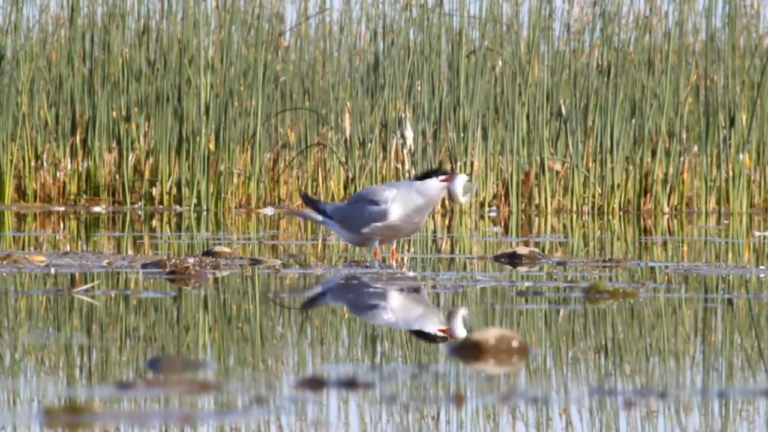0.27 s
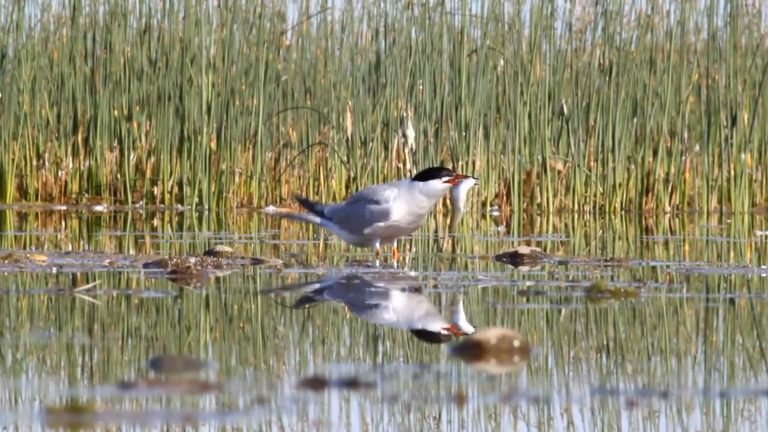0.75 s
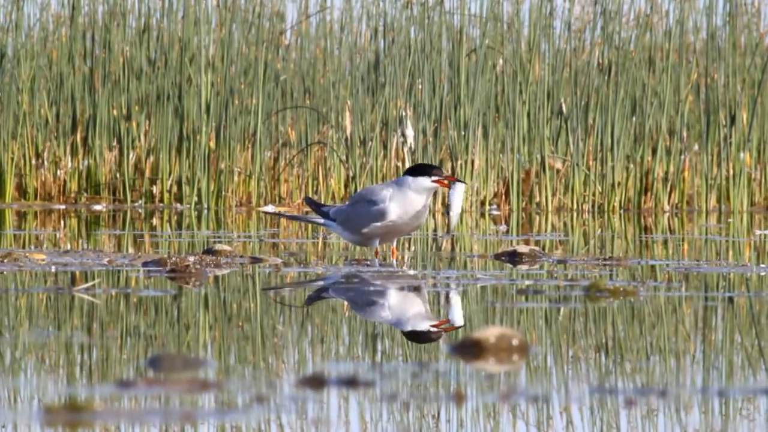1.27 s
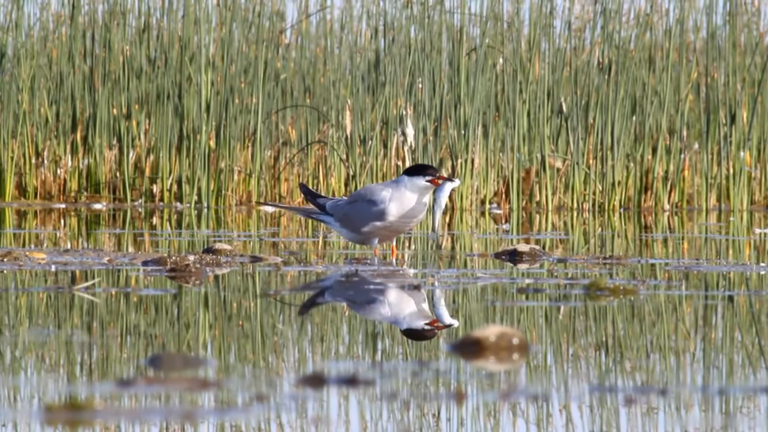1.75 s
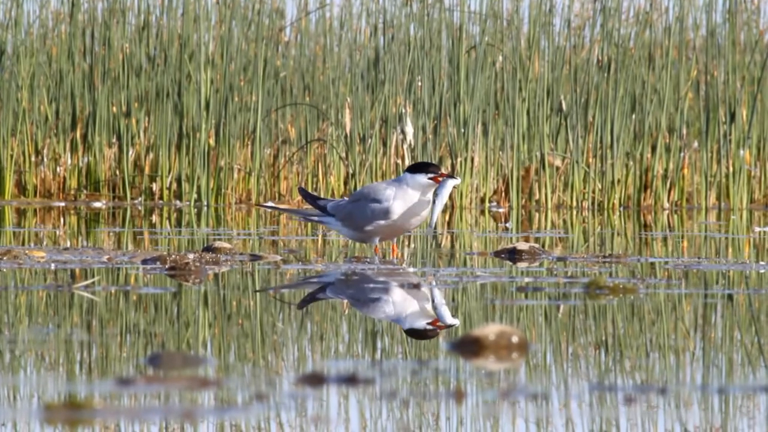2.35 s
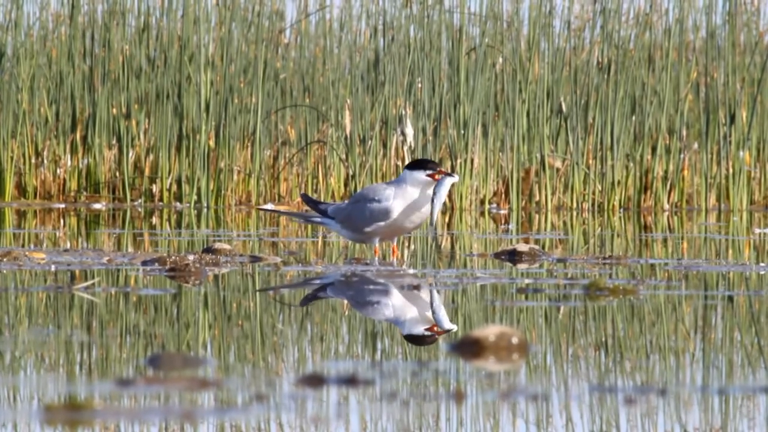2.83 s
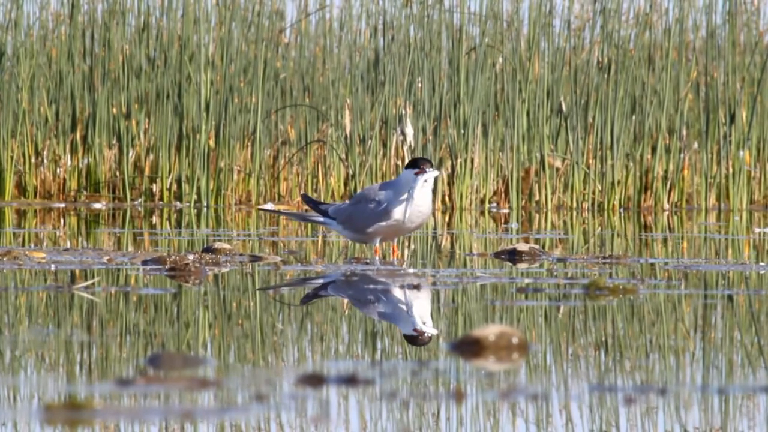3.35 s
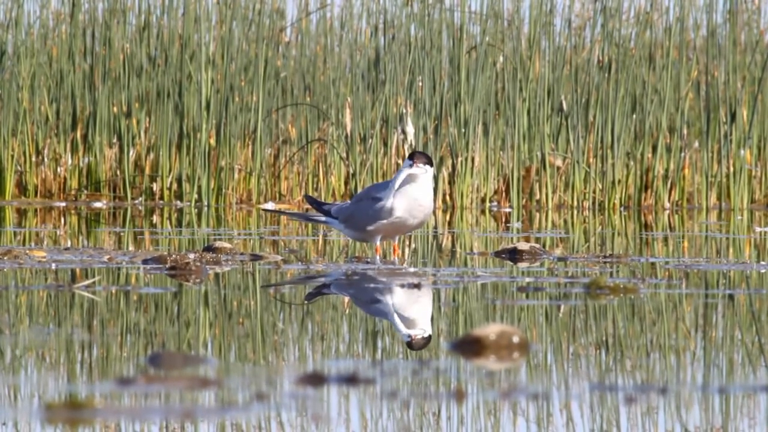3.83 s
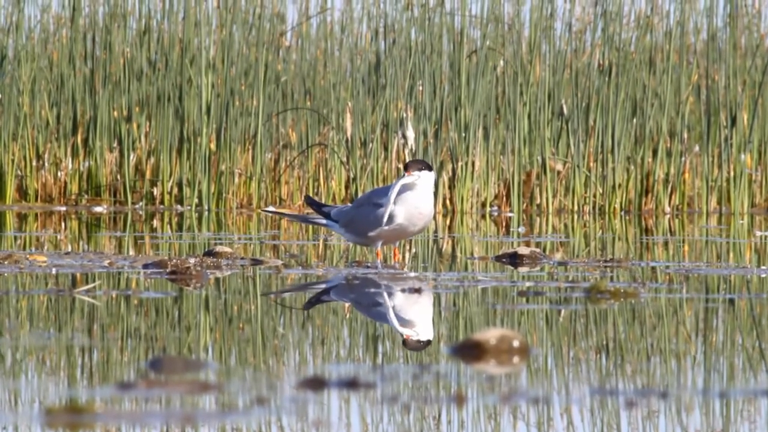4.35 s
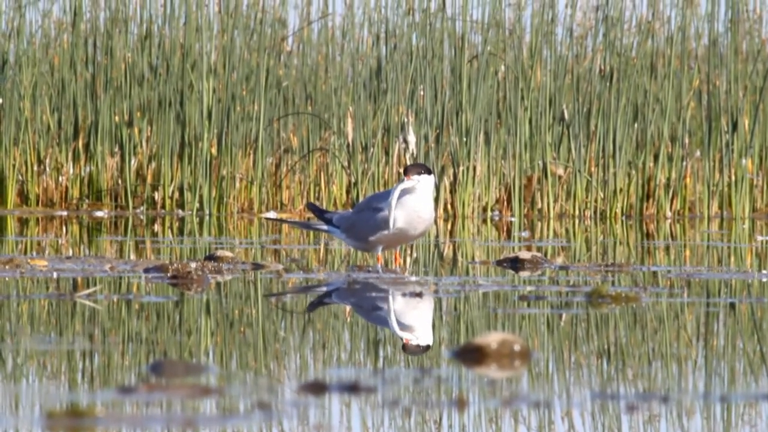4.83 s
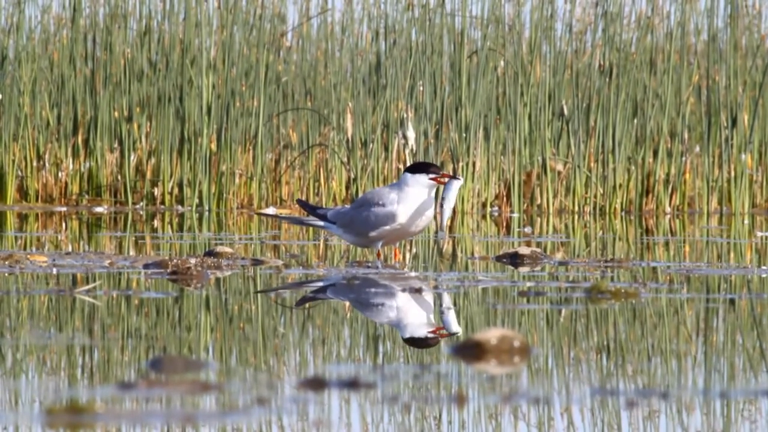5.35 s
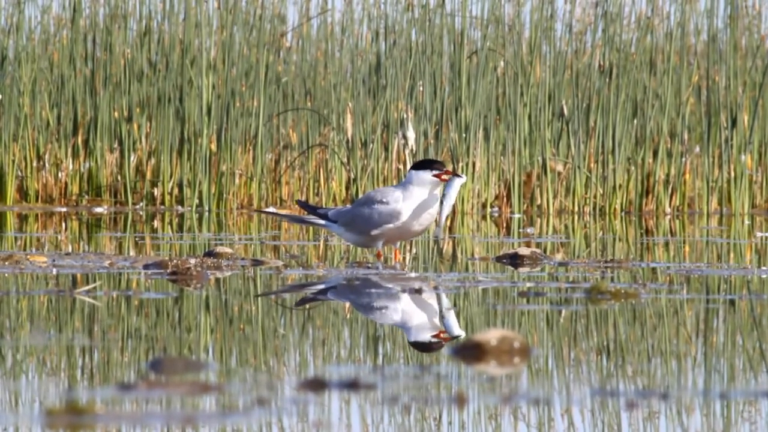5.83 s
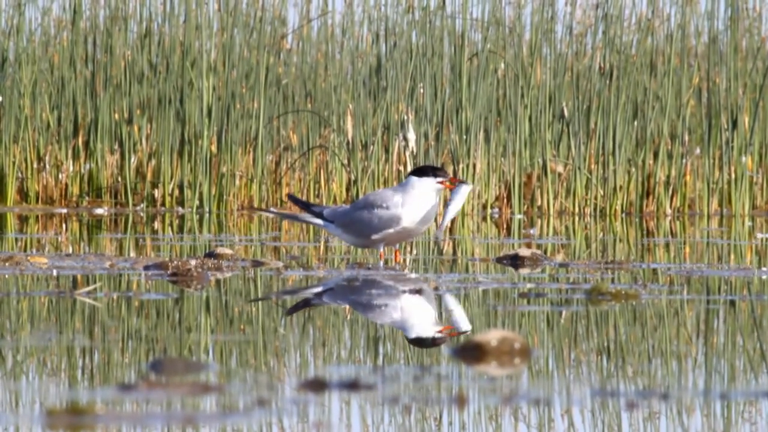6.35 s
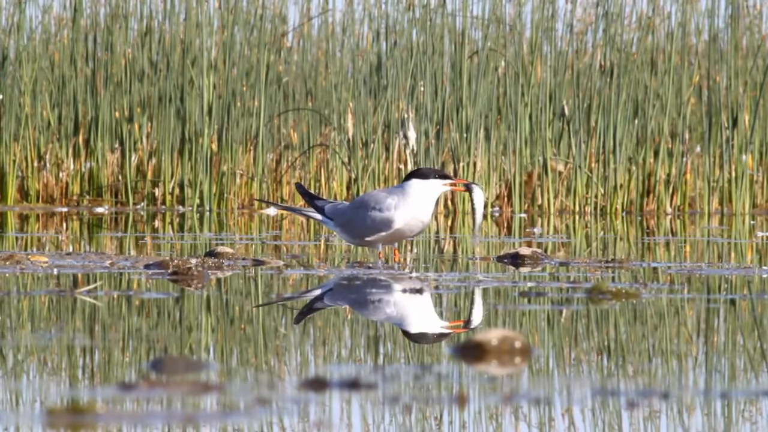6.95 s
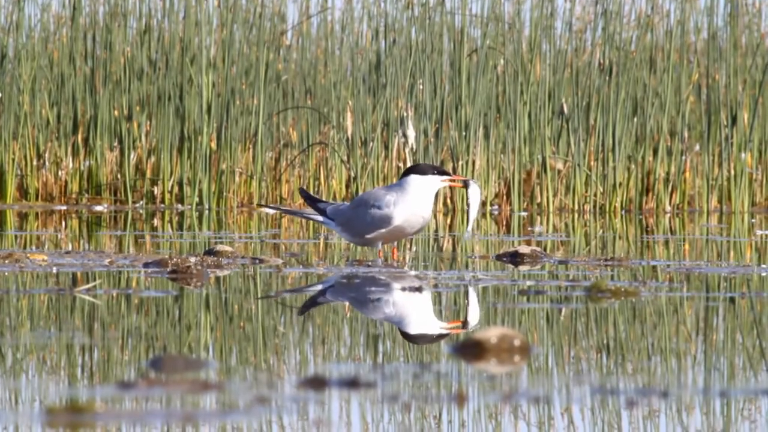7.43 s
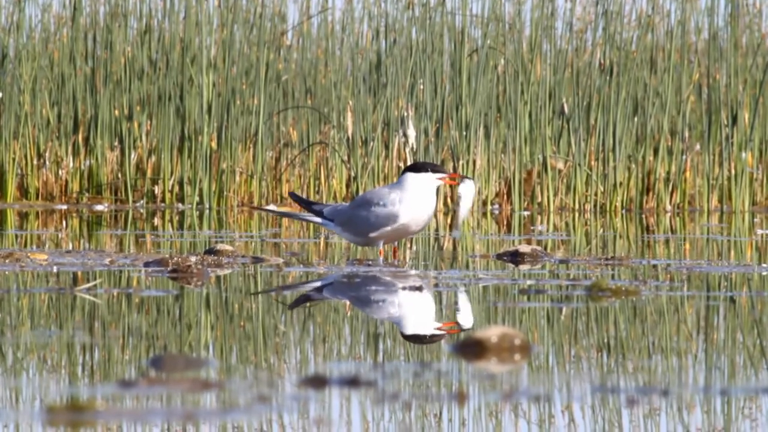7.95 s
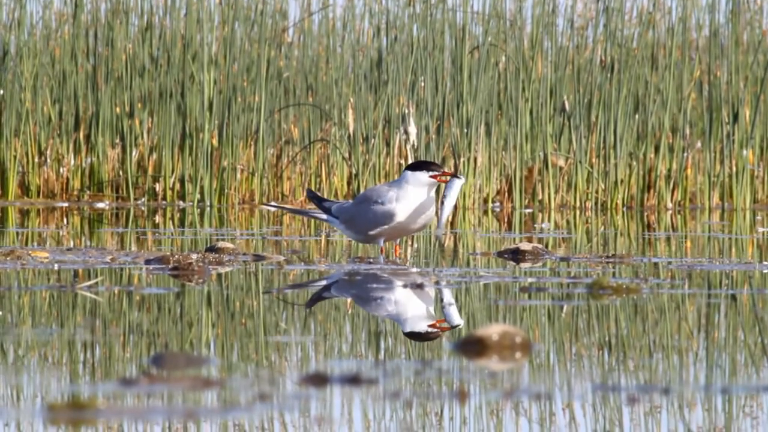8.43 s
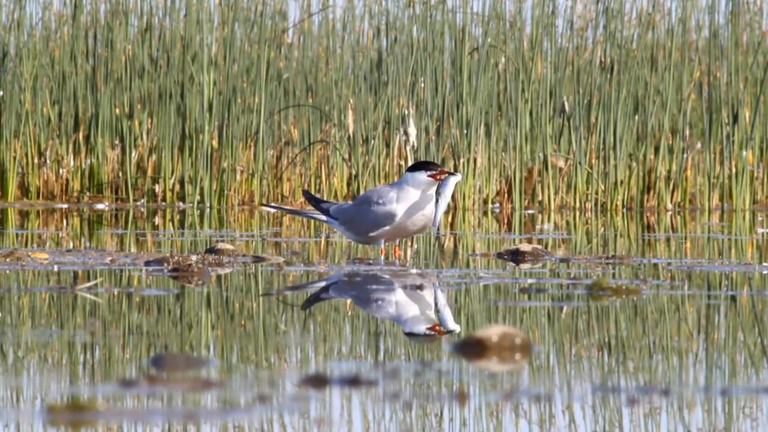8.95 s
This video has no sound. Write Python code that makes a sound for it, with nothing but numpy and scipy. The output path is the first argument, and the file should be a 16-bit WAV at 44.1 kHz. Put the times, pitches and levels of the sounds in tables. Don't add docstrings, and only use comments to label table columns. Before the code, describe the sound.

A tern by shallow water gives five harsh, rattling, grating calls, spaced apart, the last one longer, over faint low outdoor rumble.

```python
import sys
import numpy as np
from scipy import signal
from scipy.fft import rfft, irfft, next_fast_len
from scipy.io import wavfile
from scipy.ndimage import uniform_filter1d, map_coordinates

SR = 44100
rng = np.random.default_rng(int(sys.argv[2]) if len(sys.argv) > 2 else 0)


def voltage_ratio(level):
    return 10 ** (np.asarray(level, float) / 20)


def waveform_to_disk(signal):
    frames = np.transpose(np.atleast_2d(signal))
    scaled = np.clip(frames, -1, 1) * 32767
    samples = np.round(scaled).astype(np.int16)
    wavfile.write(sys.argv[1], SR, samples)


N = 405279

# f/Hz, level/dB
THROAT = [(600, -8.5), (1170, 3), (1500, -3), (1620, -5), (1780, -8.5), (2500, 9), (2950, 7.5), (3130, 8),
          (3400, 7), (3600, -0.5), (4300, -2.5), (4700, 3.6), (5050, -2.5), (5350, -2),
          (5800, -8), (6200, -13.5), (6700, -9), (7100, -12), (7500, -12), (8200, -11), (9000, -10),
         (10500, -9.0), (12300, -9), (14000, -7.9), (15700, -6.9)]
# f/Hz, core width/Hz, skirt width/Hz
SIDE_CAVITY = (3280, 40, 300)
OVERTONES = [1, -2.5, -1.74, -9.5, -21, -26, -30.5, -34, -38, -36]
SLACK_GAIN = [0, 1.5, -3, -6, -13, -18, -18, -18, -18, -18]
SAG_LOSS = [-1, -8, -1, -3, -4, -4, -4, -4, -4, -4]
# share of the call, second multiple level/dB, third multiple level/dB, higher ones level/dB
SHAPE = [(0, -4, -2, 1.3), (.2, 1.1, -0.3, 1.4), (.4, 1, -3.5, -1.3), (.6, 2, -1.7, -0.5),
         (.8, 1.8, -1.7, 0), (1, -1.5, -1.7, 0.2)]
# t/s, depth/0-1
DOUBLING = [(8.772, 0), (8.781, 0.11), (8.798, 0.2), (8.81, 0.2), (8.82, 0)]
# t/s, f/Hz, level/dB
EFFORT = [
    [(2.8394, 1741, -30.5), (2.8673, 1770, -32.5), (2.9287, 1755, -33), (3.018, 1678, -32.5),
     (3.0464, 1663, -31), (3.0749, 1507, -30.5), (3.1297, 1484, -29.5), (3.1592, 1540, -32),
     (3.1866, 1646, -36.5)],
    [(3.8524, 1590, -33), (3.8784, 1731, -30), (3.9048, 1766, -31.5), (3.9926, 1729, -32),
     (4.05, 1628, -31), (4.0774, 1522, -31), (4.1338, 1484, -32.5), (4.1617, 1610, -33.5),
     (4.1847, 1585, -39.5)],
    [(5.7665, 1674, -33), (5.7924, 1768, -32), (5.8518, 1789, -32), (5.9116, 1762, -31.5),
     (5.969, 1579, -31.5), (6.0244, 1491, -31.5), (6.0518, 1516, -30.5), (6.0773, 1548, -33),
     (6.1042, 1615, -36)],
    [(6.5775, 1664, -33.5), (6.6024, 1744, -33), (6.6303, 1758, -35), (6.6892, 1690, -35.5),
     (6.7451, 1650, -34), (6.8, 1508, -34), (6.8795, 1397, -34), (6.9077, 1560, -37), (6.9325, 1480, -38.5)],
]
# t/s, f/Hz, level/dB
LAST_EFFORT = [(8.5458, 1818, -30.5), (8.724, 1737, -33.5), (8.7775, 1607, -31), (8.8078, 1531, -30.5),
               (8.8324, 1512, -30), (8.886, 1454, -31.5), (8.9146, 1515, -33), (8.942, 1642, -33),
               (8.969, 1634, -36.5)]
# t/s, f/Hz, level/dB
LEAD_INS = [
    (2.8182, 1475, -36.5),
    (3.834, 1357, -39.5),
    (8.531, 1580, -35),
]
# voice breaks t/s, mends t/s, last throb ends t/s, final f/Hz
COURSE = [(3.095, 3.153, 3.2041, 1459), (4.098, 4.128, 4.1946, 1433), (6.018, 6.072, 6.113, 1540),
          (6.82, 6.8905, 6.942, 1470), (8.826, 8.909, 8.9974, 1514)]
# dip f/Hz, high start of a broken throb t/ms, low register level/dB,
# shut before the break t/ms, brightness level/dB
MANNER = [(256.2, 5, -7, .3, 0.5), (251, 3.37, -3, 1.8, 1), (217, 3.31, -3.5, 4.2, 0),
          (261.7, 3, -2, 2, 0.5), (213, 4.5, -3.5, 2.88, -1)]
# next throb t/s, length t/ms
CATCHES = [(3.1866, 10.5), (3.8524, 9), (4.1847, -3), (6.6024, 3), (6.7451, 5.5), (6.7725, 3), (6.9325, 6)]
# wait t/s, length t/s, first f/Hz, last f/Hz, level/dB
CROAK = (.0045, .0045, 1150, 980, -49.5)
# t/s, level/dB
SNAP = (2.1492, -36.5)
# f/Hz, level/dB, t60 t/s
SNAP_MODES = [(2260, 1, 0.0086), (3100, -2, 0.0044), (4100, -1, .007), (4900, 1, .006), (5570, -4, .005)]
# t/s, length t/s, f/Hz, level/dB, second multiple level/dB
MARSH = [
    (5.605, .06, 380, -56, -63),
    (7.535, .024, 1140, -59, -63),
    (8.5, .05, 770, -62, -75),
]
# f/Hz, level/dB per Hz
FAR = [(12, -54), (20, -27), (36, -13), (58, -5.5), (107, -1.5), (158, -2), (216, -4), (310, -14),
       (347, -10), (434, -15), (698, -16.5), (1810, -28), (7310, -38.5), (13500, -47.5), (16000, -52)]
# t/s, level/dB
SWELL = [(0, -0.5), (1.499, 0.6), (3, -0.3), (4.2, 0.5), (5, 0.3), (5.8, 1.5), (6.6, -0.6), (8, -0.4),
         (9.19, -0.2)]

CALLS = list(zip([*EFFORT, LAST_EFFORT], COURSE, MANNER))
THROB_S, SETTLED_HZ = .0285, 105
LINK_S, SHUT_LINK_S, FALL_S = .0097, 0.00419, 0.00362
DROOP_HZ, REACH_HZ, REACH, CLIMB_HZ = 10, 14.6, .35, 95.6
SHY, UNEVEN_DIP = 0.31, .1
LOW, LOW_DIP_HZ, LOW_DROOP_HZ = .805, 106.2, 28
SOONER_MS = 0.545
RESTART_MS, BROKEN_MS, MENDED_MS, FEWER_MS = 6.2, 5.2, 8.3, 2.9
SHUT_DB = -29
TIRE_DB = 3
DRIFT_DB = .3
STRAIN_HZ, STRAIN_DB = 1620, 9
FAR_DB = -44
TOP_HZ = 15790


def tern():
    voice = resonate(membranes(np.arange(N) / SR), THROAT)
    hz, core, skirt = SIDE_CAVITY
    return voice - (1 - core / skirt) * band(voice, hz, skirt)


def membranes(t):
    holds, shuts = throbs()
    pitch, level, sag = tension(t, holds)
    second, third, bright = shaping(t)
    slack = np.clip((1370 - pitch) / 130, 0, 1)
    strain = np.clip((STRAIN_HZ - pitch) / 100, 0, 1) * (1 - slack)
    strain *= np.clip((level + 35) / 4, 0, 1)
    pitch = pitch * (1 + (.0018 + .008 * slack + .01 * sag) * wobble(500))
    phase = 2 * np.pi * np.cumsum(pitch) / SR

    shaped = [0, second, third] + [bright * np.sqrt(k - 2) for k in range(4, 11)]
    voice = np.zeros(N)
    for k, (db, own, dull, loss) in enumerate(zip(OVERTONES, shaped, SLACK_GAIN, SAG_LOSS), start=1):
        flutter_db = (0.83 + 0.14 * k) * wobble(150)
        drift_db = DRIFT_DB * k * wobble(25) * (k > 3)
        voice += voltage_ratio(db + own + slack * dull + sag * loss + flutter_db + drift_db) * np.cos(k * phase)
    doubling = (.006 + .045 * strain + .3 * slack) * wobble(220) + np.interp(t, *np.transpose(DOUBLING))
    uneven = 1 + doubling * np.cos(phase / 2)

    leak = 1 + np.cos(phase)
    air = unit(band(band(rng.standard_normal(N), 4800, 3100), 4800, 3100))
    puffs = voltage_ratio(-36.5 + STRAIN_DB * strain + 19.4 * slack + 4.3 * sag * (2 - slack)) * leak * air
    hiss = unit(band(band(rng.standard_normal(N), 12500, 7000), 12500, 7000))
    fizz = voltage_ratio(-41 + 8 * slack + 6 * sag) * leak * hiss
    return np.sqrt(2) * voltage_ratio(level + shutting(t, shuts)) * (voice * uneven + puffs + fizz)


def tension(t, holds):
    start, end, first_hz, last_hz, db, dip_hz = np.transpose(holds)
    link = np.minimum(np.r_[start[1:] - end[:-1], 1], .012)
    times = np.array([start, end + .05 * link, end + .36 * link, end + .58 * link]).T.ravel()
    bends = np.array([first_hz, last_hz, dip_hz, dip_hz]).T.ravel()
    pitch = smooth(np.interp(t, times, bends), .0006)
    held = np.array([start, end]).T.ravel()
    unsagged = np.interp(t, held, np.array([first_hz, last_hz]).T.ravel())
    sag = (unsagged - pitch) / 220
    tiring = (last_hz > first_hz) | (db < -36.2)
    glide = np.clip(abs(last_hz - first_hz) * tiring, 0, 150)
    tire = TIRE_DB * glide / 200 * (first_hz > 1450)
    level = np.interp(t, held, np.array([db + tire, db - tire]).T.ravel())
    return pitch, level, np.clip(sag, 0, 1)


def shutting(t, shuts):
    lost = np.zeros(len(t))
    for close, start, depth_db in shuts:
        near = slice(*np.searchsorted(t, [close - .005, start + .005]))
        fade = np.minimum((t[near] - close) * 6000, (start - t[near]) * 14000)
        lost[near] += np.clip(-8 - fade, depth_db, 0)
    return lost


def shaping(t):
    share, bright_db = np.zeros(len(t)), np.zeros(len(t))
    for rows, course, manner in CALLS:
        begins, ends = rows[0][0], course[2]
        later = t > begins - 2 * THROB_S
        share[later] = (t[later] - begins) / (ends - begins)
        bright_db[later] = manner[-1]
    at, *shape = np.transpose(SHAPE)
    second, third, bright = (np.interp(share, at, column) for column in shape)
    return second, third, bright + bright_db


def throbs():
    holds, shuts, silent = [], [], -1
    for rows, course, manner in CALLS:
        held, shut = call(rows, course, manner)
        shuts += shut + [(silent, held[0][0] - .0004, -90)]
        holds += held
        silent = held[-1][1] + 0.00098
    return holds, shuts + [(silent, N / SR + 1, -90)]


def call(rows, course, manner):
    breaks, mends, ends, final_hz = course
    dip_hz, high_ms, low_db, before_ms, _ = manner
    s, hz, db = starts(rows)
    gap = gaps(s, hz, breaks, mends, before_ms)
    end = np.r_[s[1:] - np.maximum(LINK_S, gap[1:] + SHUT_LINK_S), ends]
    end = np.maximum(end, s + .004)
    step = np.diff(hz)
    lean = np.where(step < 0, step - DROOP_HZ, np.minimum(step, REACH_HZ + REACH * step))
    last = np.r_[hz[:-1] + lean, final_hz]
    dips = dip_hz * (1 - SHY * np.exp(-np.arange(len(s)) / 2))
    dips *= 1 + UNEVEN_DIP * rng.standard_normal(len(s))
    holds = []
    for k, (a, b, first, final, level) in enumerate(zip(s, end, hz, last, db)):
        climbed = first + CLIMB_HZ
        if breaks < a < mends:
            drop = a + (high_ms - SOONER_MS * (a - breaks) / THROB_S) / 1000
            low = LOW * first
            holds.append((a, drop, first, first - 38, level, low))
            back = mends < b
            low_end = low if back else low - LOW_DROOP_HZ
            low_dip = low + LOW_DIP_HZ if back else low_end - LOW_DIP_HZ
            holds.append((drop + FALL_S, min(b, mends - FALL_S / 2), low, low_end, level + low_db, low_dip))
            if back:
                holds.append((mends + FALL_S / 2, b, climbed, climbed, level + low_db, first))
            continue
        if a > mends:
            if a - mends < LINK_S:
                final = climbed
            elif b != ends:
                final = max(first, hz[k + 1] - DROOP_HZ)
        dip = (final + CROAK[2]) / 2 if b == ends else final - dips[k]
        holds.append((a, b, first, final, level, dip))
    wait, length, first, final, level = CROAK
    holds.append((ends + wait, ends + wait + length, first, final, level, final))
    close = s[1:] - np.maximum(gap[1:] + 0.00055, .0052)
    shuts = [(a, a + length, SHUT_DB) for a, length in zip(close, gap[1:])]
    return holds, shuts


def starts(rows):
    leads = [lead for lead in LEAD_INS if 0 < rows[0][0] - lead[0] < 2 * THROB_S]
    rows = np.array(leads + list(rows))
    periods = np.maximum(np.round(np.diff(rows[:, 0]) / THROB_S), 1)
    number = np.r_[0, np.cumsum(periods)]
    return [np.interp(np.arange(number[-1] + 1), number, column) for column in rows.T]


def gaps(s, hz, breaks, mends, before_ms):
    early = np.searchsorted(s, breaks) - np.arange(len(s))
    late_ms = np.where(s > mends, MENDED_MS, BROKEN_MS)
    ms = np.where(early > 0, before_ms - FEWER_MS * (early - 1), late_ms)
    ms[(early > 0) & (np.diff(hz, prepend=hz[0]) > SETTLED_HZ)] = RESTART_MS
    for at, odd_ms in CATCHES:
        ms[abs(s - at) < THROB_S / 3] = odd_ms
    return ms / 1000


def reeds(x):
    t = np.arange(SR // 2) / SR
    tail = band(rng.standard_normal(len(t)), 2400, 1800)
    tail *= voltage_ratio(-60 * t / 0.28) * (1 - np.exp(-t / 0.0065))
    return signal.fftconvolve(x, tail / np.linalg.norm(tail))[:N]


def small_sounds():
    out, t = np.zeros(N + SR), np.arange(SR // 10) / SR
    ring = sum(voltage_ratio(db - 60 * t / t60) * np.sin(2 * np.pi * hz * t) for hz, db, t60 in SNAP_MODES)
    snap_s, snap_db = SNAP
    out[round(snap_s * SR):][:len(t)] += voltage_ratio(snap_db) * ring * (1 - np.exp(-t / .0006))
    for s, length, hz, db, second_db in MARSH:
        note = voltage_ratio(db) * np.sin(2 * np.pi * hz * t)
        note += voltage_ratio(second_db) * np.sin(2 * 2 * np.pi * hz * t)
        out[round(s * SR):][:len(t)] += 2 * note * np.sin(np.pi * np.clip(t / length, 0, 1))
    return out[:N]


def distance():
    size = next_fast_len(N + 8192)
    hz = np.fft.rfftfreq(size, 1 / SR)
    noise = rfft(rng.standard_normal(size)) * voltage_ratio(along(FAR, hz))
    low = irfft(noise / (1 + (hz / 500) ** 2), size)[:N]
    whole = irfft(noise, size)[:N]
    swell_db = np.interp(np.arange(N) / SR, *np.transpose(SWELL)) + 0.82 * wobble(2.76)
    return voltage_ratio(FAR_DB) * (whole + (voltage_ratio(swell_db) - 1) * low) / np.std(whole)


def unit(x):
    return x / np.sqrt(np.mean(x ** 2) + 1e-20)


def along(points, hz):
    f, v = np.transpose(points)
    return np.interp(np.log(hz + 1), np.log(f + 1), v)


def wobble(rate):
    knots = rng.standard_normal(int(N * rate / SR) + 4)
    return map_coordinates(knots, [np.arange(N) * rate / SR])


def smooth(x, seconds):
    size = max(int(seconds * SR), 1)
    return uniform_filter1d(uniform_filter1d(x, size), size)


def resonate(x, points, size=8192):
    cepstrum = irfft(np.log(voltage_ratio(along(points, np.fft.rfftfreq(size, 1 / SR)))))
    cepstrum *= np.r_[1, np.full(size // 2 - 1, 2), 1, np.zeros(size // 2 - 1)]
    return signal.fftconvolve(x, irfft(np.exp(rfft(cepstrum))))[:N]


def band(x, hz, width_hz):
    return signal.lfilter(*signal.iirpeak(hz, hz / width_hz, SR), x)


def scene():
    bird = tern()
    echo = voltage_ratio(-30) * reeds(bird)
    return (bird + echo + small_sounds() + distance())[None]


def top_cut(x):
    return signal.sosfilt(signal.butter(12, 16270, fs=SR, output="sos"), x)


def record(dry):
    size = next_fast_len(N)
    passed = np.fft.rfftfreq(size, 1 / SR) < TOP_HZ
    kept = irfft(rfft(dry, size) * passed, size)[:, :N]
    return top_cut(kept)


dry = scene()
out = record(dry)
waveform_to_disk(out)
```